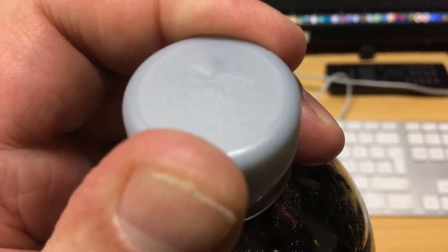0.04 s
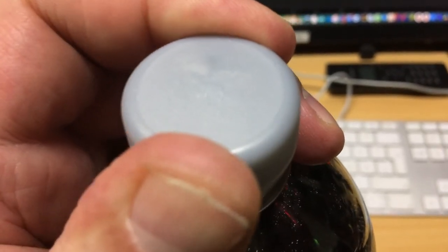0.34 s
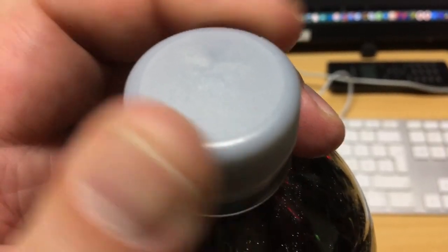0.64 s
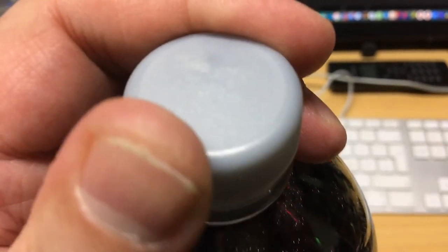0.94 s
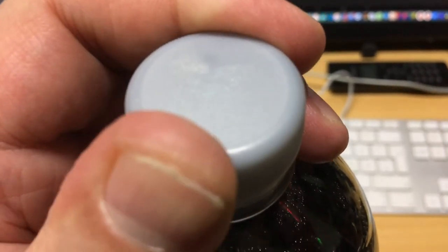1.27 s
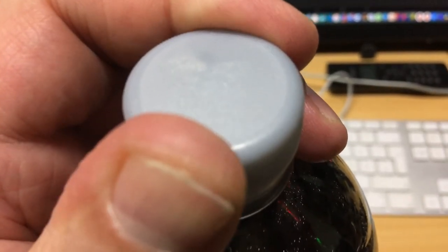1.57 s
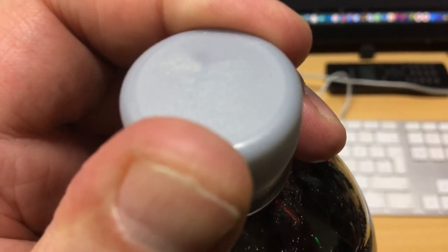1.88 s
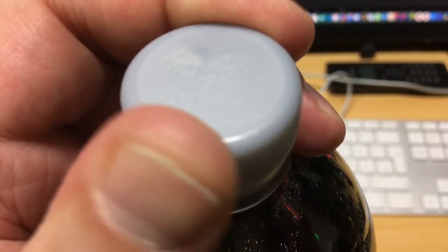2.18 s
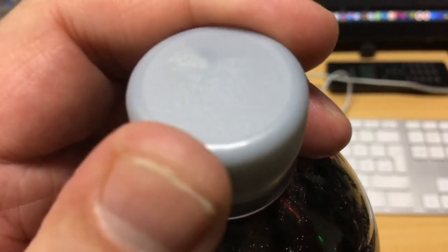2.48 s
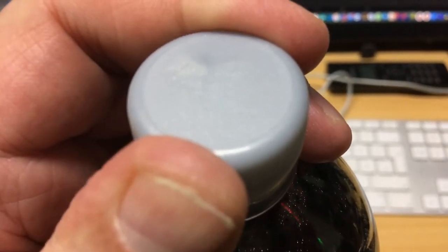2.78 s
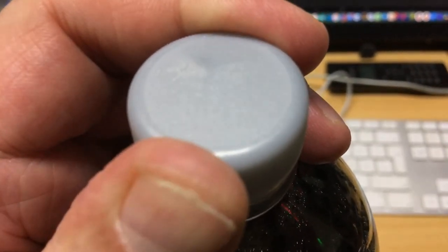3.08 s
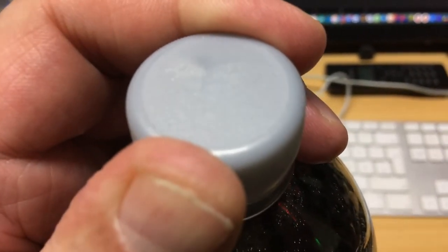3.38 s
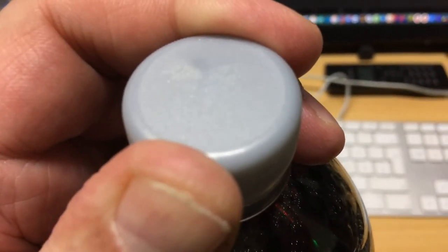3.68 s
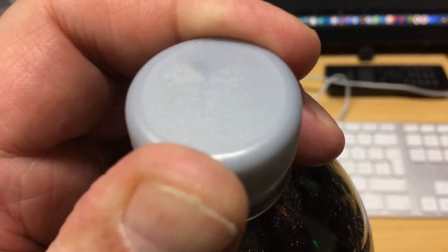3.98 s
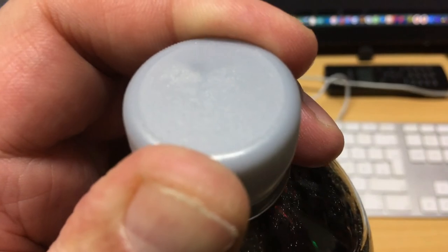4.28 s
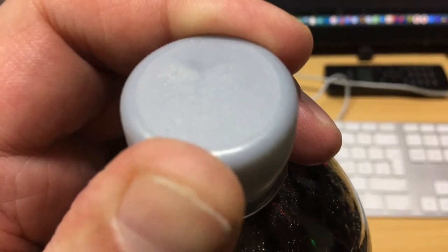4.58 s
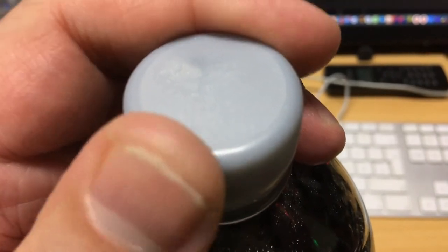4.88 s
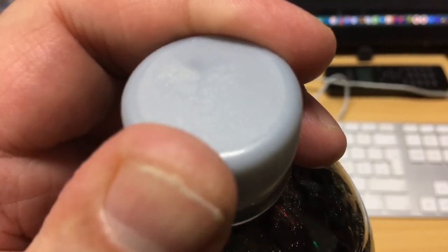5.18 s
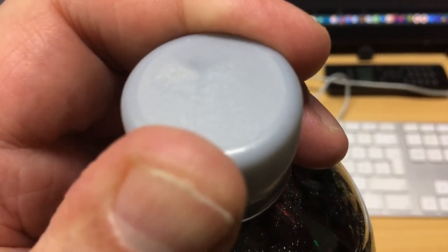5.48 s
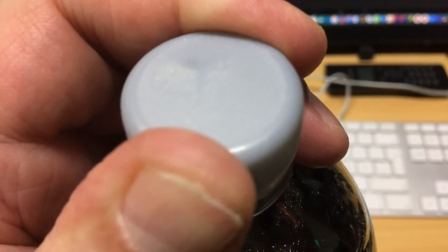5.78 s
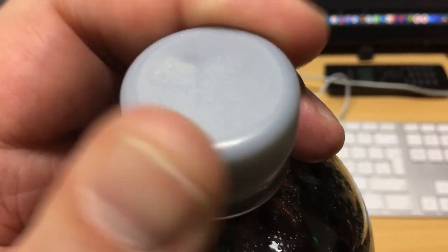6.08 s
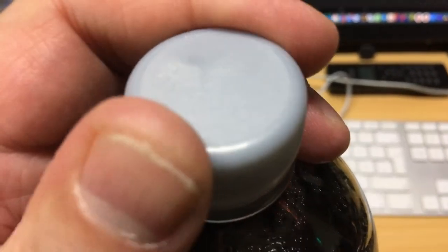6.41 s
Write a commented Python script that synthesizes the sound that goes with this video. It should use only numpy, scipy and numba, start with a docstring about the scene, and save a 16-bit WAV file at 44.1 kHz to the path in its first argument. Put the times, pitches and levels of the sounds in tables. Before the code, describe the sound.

A hand eases the cap of a plastic soda bottle open and gas escapes in a steady, dry hiss with a few tiny whistles. Foam reaches the cap and the hiss turns wet, spitting and surging. Then the gap closes, leaving faint fizzing, small bubble pops and a few plastic clicks, the last one sharp and loud. It is all heard close up in a quiet, small room.

```python
"""A dry hiss of gas, close up, as a hand eases the cap of a plastic soda bottle open over a desk.
The jet is coloured by the bottle neck and the cupped fingers, and catches in brief whistles.
Then foam reaches the thread and the hiss splutters: films burst and liquid plugs the gap.
The gap closes, the drink goes on fizzing, and the cap creaks with a few sharp clicks.
Underneath are dull knocks of the held bottle and the quiet of a small room."""
import sys
import numpy as np
from scipy import signal
from scipy.fft import rfft, irfft
from scipy.io import wavfile
from scipy.ndimage import uniform_filter1d
from numba import njit

SR = 44100
rng = np.random.default_rng(int(sys.argv[2]) if len(sys.argv) > 2 else 0)


def transcribe(signal):
    """Save signal, clipped to [-1, 1], as a 16-bit WAV file at the path in sys.argv[1]."""
    frames = np.atleast_2d(signal).T
    limited = np.clip(frames, -1, 1)
    pcm = np.round(limited * 32767).astype(np.int16)
    wavfile.write(sys.argv[1], SR, pcm)


N = 293265
T = np.arange(N) / SR
FREQS = np.maximum(np.fft.rfftfreq(N, 1 / SR), 1)
CUTOFF_HZ, USUAL_FLOW_DB = 15900, -36
JET_OPEN_S, FOAM_OPEN_S = (-.1, 2.549), (2.579, 5.601)   # the gap opens, closes

# crossovers between the four zones of the hiss: edge_hz
CROSSOVERS = [1400, 5500, 9500]
# strength of the dry jet: time_s, flow_db
JET_FLOW = [(0.03, -35.5), (0.41, -35.5), (0.79, -37), (1.31, -36.5), (1.73, -31.5), (2.41, -35),
            (2.54, -37.5)]
# broad tone of the dry jet: freq_hz, level_db
JET_EQ = [(200, -69), (400.0, -43), (700.0, -29.5), (1300.0, -11.5), (1900.0, 3), (2650.0, -2.5),
          (5000.0, -4.0), (7300.0, -4), (8300.0, -4), (9000.0, -11.5), (12000.0, -13), (16000.0, -7.5)]
# zones of the dry hiss, low to high: usual_level_db, flow_share, full_foam_db
JET_BANDS = [(-66, 1, 21), (-36, 0.99, -0.5), (-46, 1, -1.5), (-47, 0.87, 1.5)]
# resonances and a null of the bottle neck: centre_hz, width_hz, boost_db
NECK_MODES = [(2254, 121, 12.5), (5530, 190, -7.5), (5660, 72, 6), (12280, 150, 6)]
# the same for the dry gap under the cap: centre_hz, width_hz, boost_db
DRY_GAP_MODES = [(3920, 250, -1), (7794, 190, 10.5), (9800, 320, 8), (11040, 280, 7), (13950, 500, 10)]
# hollow between fingers and cap: time_s, lowest_resonance_hz, extra_boost_db
HOLLOW = [(0, 3610, 1), (.52, 3540, 0.5), (.7, 4000, 0.5), (.9, 3600, -2), (1.7, 3154, 1.5),
          (2.55, 3130, 5.5)]
# resonances of that hollow: ratio_to_lowest, width_hz, boost_db
HOLLOW_MODES = [(1, 413, 13.5), (1.52, 455, 8)]
# the thumb lifts and lets the rim ring: centre_s, length_s, pitch_hz, boost_db
RIM_LIFTS = [(.28, .66, 11950, 19), (.76, 0.17, 11350, 9), (2.25, .19, 11340, 14), (4.62, .14, 11600, 8)]
# the thumb presses down and deepens the rim's null: centre_s, length_s, depth_db
RIM_PRESSES = [(1.55, 1.1, 3.5), (5.2, 0.83, 5)]
# pocket under the thumb: centre_hz, width_hz, boost_db_per_shading_db
THUMB_POCKET = [(9800, 470, 0), (10540, 410, 1)]
# foam climbs the neck: time_s, height_0_to_1
FOAM_HEIGHT = [(0, 0), (1.7, 0.16), (2.1, 0.36), (3.7, 0.61), (4.05, 0.84), (5.6, 1)]
# room tone: freq_hz, level_db
ROOM_EQ = [(12, -37), (20, -1), (49, -1.5), (96, -14), (113, -18), (187, -15.5), (270, -22.5), (377, -25),
           (472, -27.5), (802, -24), (1220, -28), (2200, -28.5), (16000, -34)]

# the cap slips on its thread: start_s, strength_db, tilt_db_per_octave
CAP_SLIPS = [(0.058, -38, -7), (0.588, -32, -5), (0.2468, -24, -6), (2.5633, -25.5, -1.5), (5.614, -28, -3),
             (5.7787, -32.5, -2), (6.132, -48, 1), (6.379, -39, -1.5), (6.411, -38.5, -2),
             (6.478, -26.5, -2), (6.602, -38.5, -3.5), (6.632, -5, -2.5)]
# ring of cap and neck: pitch_hz, t60_s, gain_db
CAP_RING = [(2120, 0.027, -15), (2170, 0.0058, -1.5), (3570, 0.0019, -10.5), (5760, 0.022, -30),
            (6300, 0.0015, -6), (8350, 0.0029, -13), (13000, 0.00075, 1)]
# dull knocks of the held bottle: start_s, strength_db
BOTTLE_KNOCKS = [(1.172, -52.5), (1.374, -49.5), (1.691, -57), (4.168, -50), (4.215, -50.5), (5.155, -52.5),
                 (5.209, -52.5)]
# ring of the full bottle: pitch_hz, t60_s, gain_db
BOTTLE_RING = [(133.5, 0.15, -2.5), (171, 0.076, -1), (255, 0.073, 3), (274, 0.02, -27)]
# rumble of a shifting grip: freq_hz, level_db
GRIP_EQ = [(60, -17), (110, -4), (140, 0), (175, -3), (215, -16), (300, -23), (600, -45), (2000, -80)]
# the jet locks into a whistle: centre_s, length_s, level_db, pitch_hz, glide_octaves_per_s, octave_db
EDGE_TONES = [(0.208, 0.015, -35, 4040, -2.5, -4), (0.55, 0.011, -32, 3710, 5.5, -5.5),
              (1.731, 0.019, -41.5, 3882, 0.5, 8.5)]
# a twist sweeps the jet upward: centre_s, length_s, level_db, pitch_hz, glide_octaves_per_s
TWISTS = [(.605, .08, -46, 11200, 5), (.615, .13, -40.5, 5750, 1), (.7, .12, -48, 6900, .3)]

# broad tone of the flow through foam: freq_hz, level_db
FOAM_EQ = [(200, -25), (400.0, -22.0), (680.0, -14.5), (850.0, -14), (1400.0, -5.5), (1950.0, 2),
           (2650.0, -1), (3500.0, -4.5), (5500.0, -14.5), (8000.0, -15.5), (8800.0, -22.5), (12000.0, -10),
           (16000.0, -13)]
# zones of the wet hiss, low to high: usual_level_db, flow_share, full_foam_db
FOAM_BANDS = [(-66, 1.11, 17), (-35.5, 1.034, 0), (-46, 0.51, -4), (-44.5, 0.62, -5.5)]
# resonances and a null of the wet gap: centre_hz, width_hz, boost_db
WET_GAP_MODES = [(3120, 390, 6.5), (4584, 300, 10), (6280, 740, -11), (7250, 330, 4), (9740, 290, 7),
                 (13500, 540, 8.5)]
# wetness of the thread: time_s, splutter_depth_db
SPLUTTER = [(2.58, 2.5), (2.85, 2.5), (3.0, 3.8), (3.7, 2.5), (3.95, 1.14), (5.3, 1), (5.6, 3)]
# the thread clears and the flow surges: centre_s, length_s, boost_db
FLOW_SURGES = [(2.64, 0.072, 2), (2.757, 0.047, 4.5), (3.17, .12, 2.5), (3.57, 0.2, 2), (3.82, .06, 1.5),
               (3.95, 0.25, 6), (4.26, 0.3, 8), (5.38, 0.36, 9), (5.51, 0.054, 3)]
# gas spits through a film, then liquid plugs the gap: centre_s, length_s, strength_db, pitch_hz, plug_db
SPITS = [(2.5815, .0035, -26.5, 2940, -4), (2.847, 0.013, -30, 2520, -3), (2.9337, 0.0034, -32, 2820, -1),
         (2.991, 0.0047, -35, 2480, 3), (3.014, .005, -33.5, 2570, 2), (3.096, 0.015, -36, 3350, 1),
         (3.176, 0.0066, -37, 4420, 4), (3.467, .005, -35, 4200, 13), (3.58, 0.0045, -27.5, 2760, 13),
         (3.655, .0043, -33.5, 3300, 12), (3.809, .004, -33, 4850, 3), (5.507, .018, -35.5, 2170, 1)]
# liquid briefly stifles the hiss, mostly just before a spit: centre_s, length_s, depth_db
GAP_CHOKES = [(2.826, .024, 2), (2.921, .014, 3), (2.977, .016, 3), (3.075, .041, 5), (3.455, .014, 4),
              (3.692, 0.015, 11), (3.855, .012, 10)]
# gas slips out as the cap turns, and the rows at 6.217 s and 6.537 s are two dull, longer rubs: centre_s,
# length_s, level_db, tilt_db_per_octave
GAS_WISPS = [(2.597, .017, -35.5, 4.5), (4.577, .02, -44.5, 6), (5.992, 0.023, -52, 0.5),
             (6.019, .028, -50.5, 2.5), (6.133, 0.0075, -50.5, -4), (6.217, 0.1, -61, 0.5),
             (6.483, 0.028, -55, 6), (6.537, 0.06, -56, 0)]
# tone of a wisp before its tilt: freq_hz, level_db
WISP_EQ = [(300, -33), (1300, -1), (2300, 3), (4000, -6), (6300, -7), (9000, -10.5), (16000, -14)]
# a pinhole whistles faintly and sinks: centre_s, length_s, level_db, pitch_hz, glide_octaves_per_s
PINHOLE_TONE = [(5.77, 0.14, -70, 10500, -1.0)]
# the largest bubbles burst: start_s, level_db, pitch_hz
BUBBLE_POPS = [(3.622, -27, 4810), (3.7875, -19, 13300), (3.8745, -25, 4580), (4.572, -23, 9400),
               (5.9835, -38, 6980), (6.0184, -30, 6460), (6.0268, -28, 6140), (6.063, -35, 5350),
               (6.2296, -37, 7000), (6.2708, -35, 6820), (6.2817, -35, 6100), (6.319, -38, 7400),
               (6.356, -38, 8550)]
# a liquid film flutters and slackens as the gap closes: time_s, pitch_hz
FILM_PITCH = [(4.2, 644), (4.45, 545), (4.85, 530), (4.96, 620), (5.2, 495), (5.35, 630), (5.45, 462),
              (5.6, 260)]
# fizz under the closed cap: time_s, level_db
FIZZ_LEVEL = [(5.6, -64), (5.75, -71), (5.85, -65.5), (6.1, -68), (6.27, -60.5), (6.42, -68.5), (6.65, -57)]


def from_db(db):
    """Decibels to gain."""
    return 10 ** (np.asarray(db) / 20)


def rms_one(x):
    """Scale to unit rms."""
    return x / np.sqrt(np.mean(x ** 2) + 1e-20)


def in_time(rows):
    """Each column of an automation curve, at every sample."""
    times, *columns = np.transpose(rows)
    return [np.interp(T, times, column) for column in columns]


def coloured(x, points):
    """Shape x with a smooth EQ curve; rms 1."""
    hz, db = np.transpose(points)
    gain = from_db(np.interp(np.log(FREQS), np.log(hz), db))
    return rms_one(irfft(rfft(x) * gain, N))


def low_cut(x, hz, order=2):
    """Roll off the bass."""
    return signal.sosfilt(signal.butter(order, hz, "high", fs=SR, output="sos"), x)


def below(edge_hz):
    """Gain of a steep crossover under its edge."""
    return 1 / (1 + (FREQS / edge_hz) ** 12)


def noise():
    """White noise."""
    return rng.standard_normal(N)


def drift(rate_hz):
    """Random wander up to about rate_hz; rms 1."""
    return rms_one(irfft(rfft(noise()) / (1 + (FREQS / rate_hz) ** 2), N))


def swells(rows):
    """Rounded humps from rows of centre_s, length_s, height."""
    return sum(height / (1 + (2 * (T - s) / length) ** 4) for s, length, height in rows)


def grains(per_s, spread_db):
    """Random clicks, many small and a few large."""
    sizes = from_db(spread_db * np.minimum(rng.exponential(1, N), 4))
    return rms_one((rng.random(N) < per_s / SR) * sizes * rng.choice([-1, 1], N))


def strikes(times, db):
    """One click at each time."""
    out = np.zeros(N)
    out[np.clip(np.round(times * SR).astype(int), 0, N - 1)] = from_db(db)
    return out


def ring(clicks, hz, t60):
    """A unit click sets a sine of height 1 ringing."""
    r, w = from_db(-60 / (t60 * SR)), 2 * np.pi * hz / SR
    return signal.lfilter([0, np.sin(w)], [1, -2 * r * np.cos(w), r * r], clicks + 1e-18)


@njit
def bandpass(x, w, r):
    """Two-pole resonance whose centre w (radians per sample) may move; gain 1 at the peak."""
    y = np.zeros(len(x))
    for i in range(2, len(x)):
        drive = (1 - r * r) / 2 * (x[i] - x[i - 2])
        y[i] = drive + (1 + r * r) * np.cos(w[i]) * y[i - 1] - r * r * y[i - 2]
    return y


def resonate(x, modes):
    """Boost or cut x at each centre_hz, width_hz, boost_db in turn."""
    for hz, width, db in modes:
        band = bandpass(x, np.full(N, 2 * np.pi / SR) * hz, np.exp(-np.pi * width / SR))
        x = x + (from_db(db) - 1) * band
    return x


def narrow(hz, width_hz):
    """Noise twice through one moving resonance, for steep skirts; rms 1."""
    w, r = 2 * np.pi * hz / SR, np.exp(-np.pi * width_hz / SR)
    return rms_one(bandpass(bandpass(rng.standard_normal(len(hz)), w, r), w, r))


def glides(rows, width_hz):
    """Sliding puffs of narrow hiss: centre_s, length_s, level_db, pitch_hz, glide_octaves_per_s."""
    out = np.zeros(N)
    for s, length, db, hz, glide in rows:
        near = np.abs(T - s) < 2 * length
        t = T[near] - s
        pitch = np.clip(hz * 2 ** (glide * t), 1500, CUTOFF_HZ)
        out[near] += from_db(db) * narrow(pitch, width_hz) / (1 + (2 * t / length) ** 4)
    return low_cut(out + 1e-18, hz=1600)


def ride_hiss(hiss, flow_db, bands, open_s):
    """While the gap is open, flow and foam ride each zone's slow level; its fast texture stays."""
    foam, = in_time(FOAM_HEIGHT)
    zones = np.diff([0 * FREQS] + [below(hz) for hz in CROSSOVERS] + [below(2 * CUTOFF_HZ)], axis=0)
    spectrum, out = rfft(hiss), 0
    for zone, (usual_db, share, foam_db) in zip(zones, bands):
        band = irfft(spectrum * zone, N)
        slow_rms = np.sqrt(uniform_filter1d(band ** 2, size=SR // 9) + 1e-12)
        level_db = usual_db + share * (flow_db - USUAL_FLOW_DB) + foam_db * foam
        out = out + from_db(level_db) * band / slow_rms
    opens, closes = open_s
    return out * np.interp(T, [opens - .001, opens, closes, closes + .003], [0, 1, 1, 0])


def rim_modes(covered_hz=11960, covered_db=-1, width_hz=900, null_width_hz=300):
    """The cap's rim rings above a null while the thumb is lifted; a covering thumb adds a pocket."""
    hz = covered_hz + swells([(s, length, open_hz - covered_hz) for s, length, open_hz, _ in RIM_LIFTS])
    lift_db = swells([(s, length, boost_db) for s, length, _, boost_db in RIM_LIFTS])
    db = covered_db - swells(RIM_PRESSES) + lift_db
    null = (0.86 * hz, null_width_hz, -0.4 * np.maximum(db, 0))
    shading_db = np.maximum(-db, 0)
    pocket = [(pocket_hz, width, share * shading_db) for pocket_hz, width, share in THUMB_POCKET]
    return [(hz, width_hz, db), null] + pocket


def dry_jet(unrest_db=1.0):
    """Smooth turbulence; the resonances of the hand slide as the thumb moves."""
    hollow_hz, extra_db = in_time(HOLLOW)
    flow_db, = in_time(JET_FLOW)
    hand = [(ratio * hollow_hz, width, db + extra_db) for ratio, width, db in HOLLOW_MODES]
    jet = coloured(noise(), JET_EQ) * from_db(-unrest_db * drift(110))
    jet = resonate(jet, NECK_MODES + DRY_GAP_MODES + hand + rim_modes())
    return ride_hiss(jet, flow_db, JET_BANDS, JET_OPEN_S)


def room(x, t60_s=0.1, wet_db=-27, tone_db=-59):
    """A small furnished room answers faintly over its own low, steady tone."""
    t = T[:SR // 2]
    tail = rng.standard_normal(len(t)) * from_db(-60 * t / t60_s) * (t > .003)
    reverb = signal.fftconvolve(x, tail / np.sqrt(np.sum(tail ** 2)))[:N]
    return from_db(wet_db) * reverb + from_db(tone_db) * coloured(noise(), ROOM_EQ)


def cap_clicks(trim_db=5):
    """A slip is a short crack of the cap, then the neck rings on; so small a body gives little bass."""
    times, db, tilt_db = np.transpose(CAP_SLIPS)
    neck_hz, cracks = NECK_MODES[0][0], 0
    for k, (hz, t60, mode_db) in enumerate(CAP_RING):
        hits = strikes(times, db + trim_db + mode_db + tilt_db * np.log2(hz / neck_hz))
        cracks = cracks + (-1) ** k * ring(hits, hz, t60)
    return low_cut(cracks, hz=800, order=1)


def bottle_knocks(slip_db=-41, slip_share=0.52, ceiling_db=-56.5, scatter_db=2.2):
    """The full bottle answers the hand and the slipping cap with low knocks."""
    slips = [(s, min(slip_db + slip_share * db, ceiling_db)) for s, db, _ in CAP_SLIPS]
    times, db = np.transpose(list(BOTTLE_KNOCKS) + slips)
    return sum(ring(strikes(times, db + mode_db + rng.normal(0, scatter_db, len(times))), hz, t60)
               for hz, t60, mode_db in BOTTLE_RING)


def whistles(jitter=0.017):
    """An edge tone at the lip of the cap, with its octave."""
    out = np.zeros(N)
    for s, length, db, hz, glide, octave_db in EDGE_TONES:
        near = np.abs(T - s) < 2 * length
        t = T[near] - s
        pitch = hz * 2 ** (glide * t) * (1 + jitter * drift(400)[near])
        phase = 2 * np.pi * np.cumsum(pitch) / SR
        tone = np.sin(phase) + from_db(octave_db) * np.sin(2 * phase)
        out[near] += from_db(db) * tone / (1 + (2 * t / length) ** 4)
    return out


def twist_sweeps():
    """A twist of the cap sweeps bands of the jet upward."""
    return glides(TWISTS, width_hz=2400)


def grip_rumble(peak_s=.925, peak_db=-44.5, rise_db_per_s=180, fall_db_per_s=120):
    """The fingers shift their grip once and the bottle rumbles."""
    db = peak_db - np.maximum(rise_db_per_s * (peak_s - T), fall_db_per_s * (T - peak_s))
    return from_db(db) * coloured(noise(), GRIP_EQ)


def wet_flow_db(start_db=-36.5, sag_db_per_s=4):
    """Flow through foam sinks as the pressure is spent, and surges whenever the thread clears."""
    return start_db - sag_db_per_s * np.maximum(T - FOAM_OPEN_S[0], 0) + swells(FLOW_SURGES)


def film_holes(depth_db, centre_hz=4100, wander_octaves=0.46, width_hz=600):
    """Holes in the foam open and shrink: one resonance darts about, stronger the wetter the thread."""
    hz = centre_hz * 2 ** np.clip(wander_octaves * drift(27), -1, 1)
    return [(hz, width_hz, 1.6 * depth_db)]


def wet_jet(films_db=-9.5, split_hz=4800, plug_delay_s=0.0058, plug_s=0.013, stall_s=0.006, stall_db=6):
    """Foam chops the jet: films burst, plugs stifle the treble most, the flow stalls before each spit."""
    depth_db, = in_time(SPLUTTER)
    film_gain = from_db(films_db + 0.77 * depth_db)
    source = coloured(noise() + film_gain * grains(per_s=1500, spread_db=0.5), FOAM_EQ)
    body = irfft(rfft(source) * below(split_hz), N)
    top = source - body
    plugs = [(s + plug_delay_s, plug_s, plug_db) for s, *_, plug_db in SPITS]
    choke_db = swells(GAP_CHOKES) + swells(plugs)
    chop = drift(190)
    body_db = depth_db * chop - 0.69 * choke_db
    top_db = depth_db * (0.24 * chop + drift(220)) - choke_db   # the top flickers mostly on its own
    gas = body * from_db(body_db) + top * from_db(top_db)
    gas = resonate(gas, NECK_MODES + WET_GAP_MODES + rim_modes() + film_holes(depth_db))
    dip_db = swells([(s - (length + stall_s) / 2, stall_s, stall_db) for s, length, *_ in SPITS])
    return from_db(-dip_db) * ride_hiss(gas, wet_flow_db(), FOAM_BANDS, FOAM_OPEN_S)


def spits(trim_db=-1, fall_octaves=0.17):
    """Short spits whose pitch falls as the hole in the film widens."""
    rows = [(s, length, db + trim_db, hz, -fall_octaves / length) for s, length, db, hz, _ in SPITS]
    return glides(rows, width_hz=1700)


def wisps(crackle_db=-3):
    """The little gas left seeps out in crackly puffs and through a pinhole; the same noise also shapes two
    dull, longer rubs."""
    seep = noise() + from_db(crackle_db) * grains(per_s=620, spread_db=6.5)
    puffs = 0
    for s, length, db, tilt_db in GAS_WISPS:
        eq = [(hz, level + tilt_db * np.log2(hz)) for hz, level in WISP_EQ]
        puffs = puffs + swells([(s, length, from_db(db))]) * coloured(seep, eq)
    return puffs + glides(PINHOLE_TONE, width_hz=650)


def spray(from_s=2.93, to_s=3.85, length_s=.004, level_db=-45, spread_db=3, low_hz=12000, high_hz=15000):
    """While the thread is at its wettest, tiny films burst at random in bright specks."""
    rows = []
    for when, size, pitch in rng.random((36, 3)):
        s = from_s + (to_s - from_s) * when
        db = level_db + spread_db * (2 * size - 1)
        rows.append((s, length_s, db, low_hz + (high_hz - low_hz) * pitch, 0))
    return glides(rows, width_hz=2400)


def pops(cycles=11):
    """Each large bubble bursts in a bright tick of a few cycles."""
    ticks = sum(ring(strikes(np.array([s]), db), hz, cycles / hz) for s, db, hz in BUBBLE_POPS)
    return low_cut(ticks, hz=2500)


def film_flutter(usual_db=-58.5, flow_share=0.71, width_hz=140, octave_db=-6.0):
    """A flapping film gives a faint, airy note and its octave, louder with more flow."""
    hz, = in_time(FILM_PITCH)
    db = usual_db + flow_share * (wet_flow_db() - USUAL_FLOW_DB)
    sounding = (T > FILM_PITCH[0][0]) & (T < FOAM_OPEN_S[1])
    note = narrow(hz, width_hz) + from_db(octave_db) * narrow(2 * hz, 2 * width_hz)
    return sounding * from_db(db) * note


def fizz(low_hz=3000, high_hz=9600, sizes=10, cycles=12):
    """Tiny bubbles prickle once the gap has closed, each size at a pitch of its own."""
    db, = in_time(FIZZ_LEVEL)
    pitches = np.geomspace(low_hz, high_hz, sizes)
    ticks = sum(ring(grains(per_s=9, spread_db=3.0), hz, cycles / hz) for hz in pitches)
    return (T > FOAM_OPEN_S[1]) * from_db(db) * rms_one(low_cut(ticks, hz=2500))


def scene(duck_db=4):
    """Bottle and hand close by, over the quiet of the room; each whistle ducks the dry hiss."""
    duck = from_db(-swells([(s, length, duck_db) for s, length, *_ in EDGE_TONES]))
    dry_gas = duck * dry_jet() + whistles() + twist_sweeps()
    wet_gas = wet_jet() + spits() + spray() + film_flutter() + wisps()
    bubbles = pops() + fizz()
    handling = cap_clicks() + bottle_knocks() + grip_rumble()
    bottle = dry_gas + wet_gas + bubbles + handling
    return (bottle + room(bottle))[None]


def record(dry):
    """A steep high cut takes off the very top."""
    return signal.sosfilt(signal.ellip(10, .1, 70, CUTOFF_HZ, fs=SR, output="sos"), dry)


dry = scene()
out = record(dry)
transcribe(out)
```